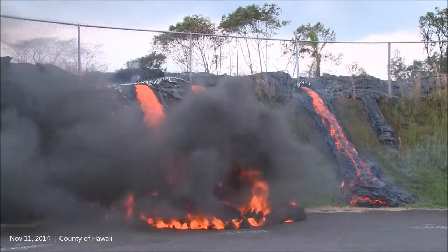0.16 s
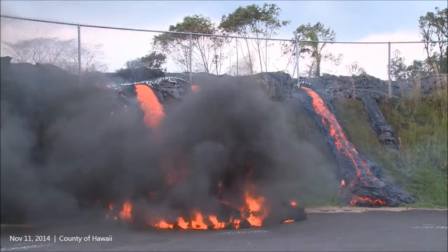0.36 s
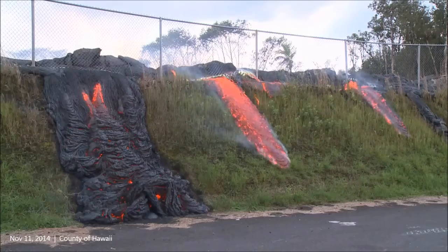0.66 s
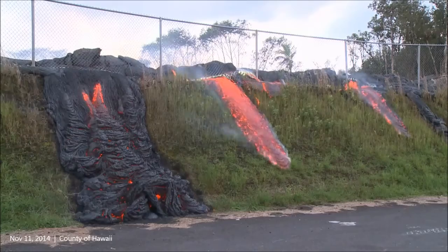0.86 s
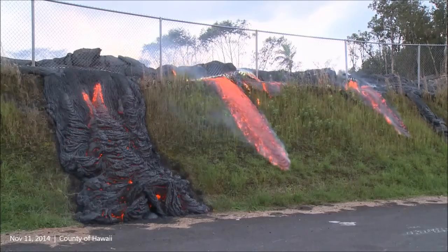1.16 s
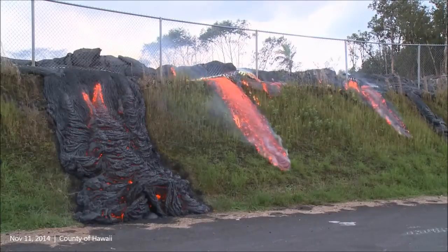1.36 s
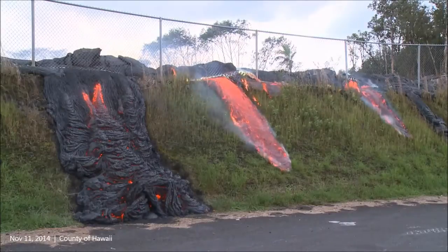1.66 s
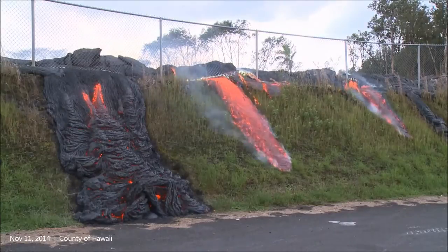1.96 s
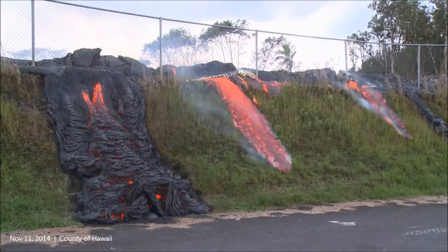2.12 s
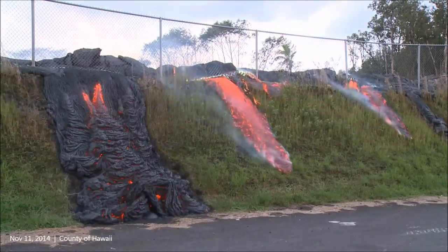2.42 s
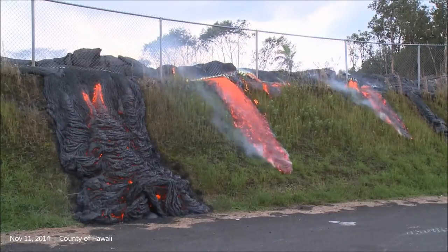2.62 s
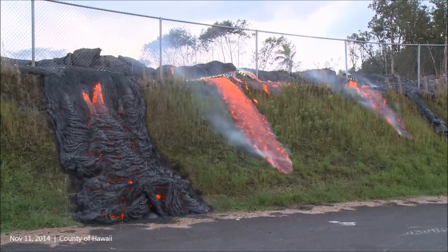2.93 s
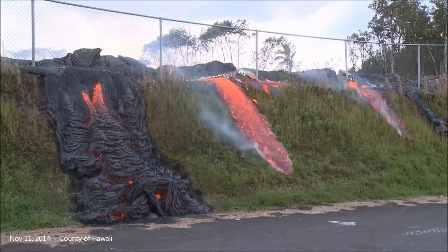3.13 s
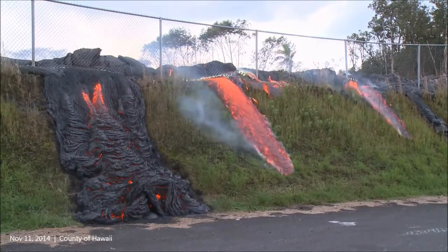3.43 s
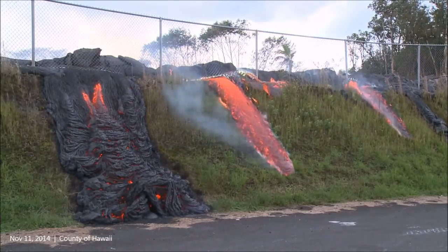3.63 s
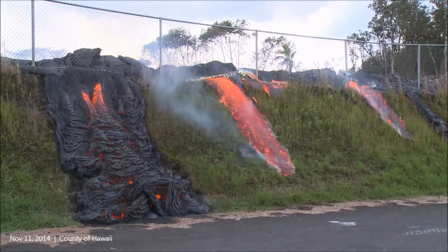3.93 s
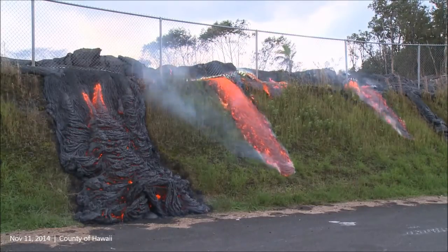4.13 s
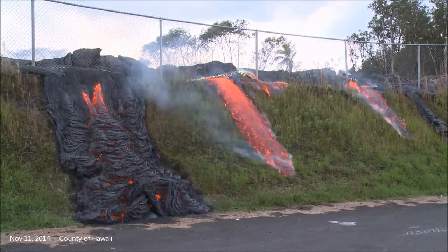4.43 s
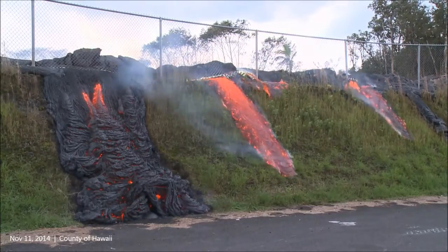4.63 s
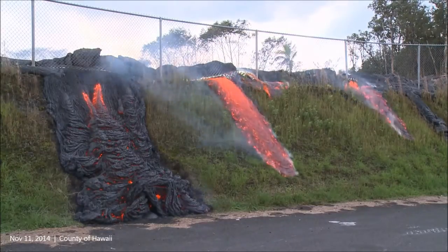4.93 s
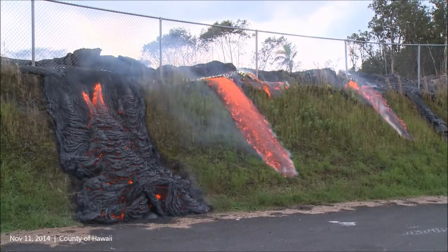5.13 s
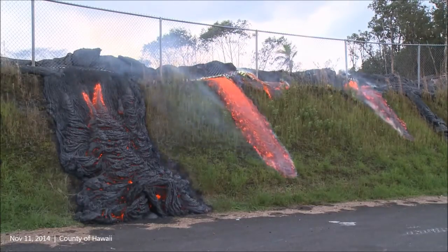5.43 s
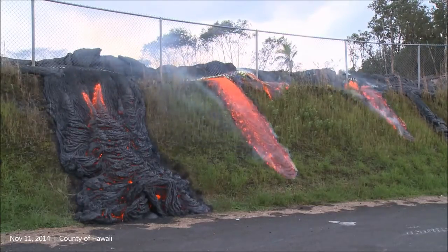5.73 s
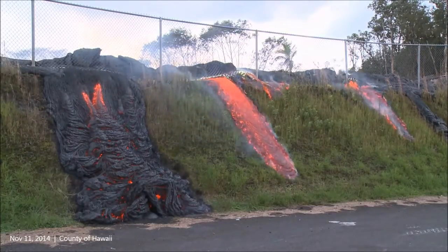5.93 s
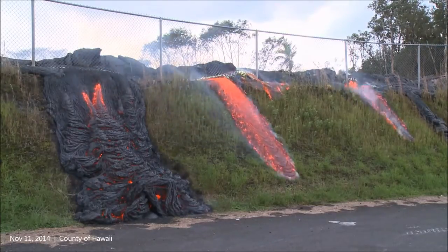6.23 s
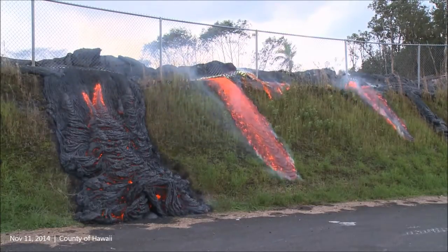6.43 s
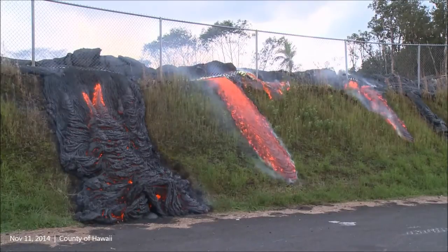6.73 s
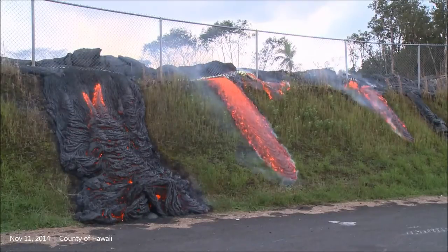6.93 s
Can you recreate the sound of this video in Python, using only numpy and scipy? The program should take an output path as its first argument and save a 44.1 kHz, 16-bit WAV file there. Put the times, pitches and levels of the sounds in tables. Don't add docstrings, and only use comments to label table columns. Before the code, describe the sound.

Brief close asphalt flames, a tiny silent gap, then irregular crackling and popping of burning grass with soft sizzle and low rumble.

```python
import sys
import numpy as np
from scipy import signal
from scipy.io import wavfile
from scipy.ndimage import uniform_filter1d

SR = 44100
rng = np.random.default_rng(int(sys.argv[2]) if len(sys.argv) > 2 else 0)


def volts_from_db(level):
    exponent = np.asarray(level, float) / 20
    return 10 ** exponent


def materialize(psi):
    bounded = np.clip(np.atleast_2d(psi).T, -1, 1)
    quanta = np.round(bounded * 32767).astype(np.int16)
    wavfile.write(sys.argv[1], SR, quanta)


N = 311787

CHANGE_S, MUTE_S, BACK_S = 0.504, 0.553, 0.6055
ECHO_MS = 1.6

# start_s, pop_peak_db, pulse_ms (pocket size), snap_peak_db, ground_echo_db
POCKET_BURSTS = [(0.1847, -35.5, 0.053, -58, -31), (0.2489, -34.5, 0.12, -68, -21),
                 (0.6077, -33.5, 0.047, -40, -17), (1.008, -29, 0.043, -35.5, -7),
                 (1.1351, -23, 0.028, -21.5, -21), (1.6107, -12.5, 0.012, -15, -33),
                 (1.7896, -26.5, 0.022, -56, -9), (1.8523, -33.5, 0.11, -43, -3),
                 (2.328, -29, 0.027, -27, -7), (2.7393, -35.5, 0.14, -54, -2),
                 (2.7472, -35.5, 0.048, -42, -12), (3.175, -23.5, 0.083, -36.5, -2),
                 (3.188, -27.5, 0.062, -40, -9), (3.201, -39.5, 0.032, -38, 8),
                 (3.5967, -15.5, 0.04, -18.5, -5), (3.8359, -24, 0.017, -46, -11),
                 (4.588, -31.5, 0.041, -37, 1), (4.6668, -25, 0.081, -42, -5.5),
                 (4.782, -31, 0.028, -33, -30), (5.4317, -26, 0.37, -67, -13),
                 (6.2424, -36, 0.22, -70, -15), (6.718, -32.5, 0.04, -37.5, -16),
                 (6.9203, -44, 0.021, -37, -8), (7.0151, -34.5, 0.047, -39, -21)]
# time_s, level_db
GRASS_BURN = [(0.61, -3), (0.8, 2.5), (1.2, 2.5), (1.5, -1.5), (1.75, 2.5), (1.95, 2.5), (2.15, -1.5),
              (2.3, 1.5), (2.5, -2.5), (2.9, -0.7), (3.2, -3), (3.55, -3), (4, 1.5), (4.3, 2.5),
              (4.6, 0.28), (5.1, 1.5), (5.4, -2.5), (7.07, -3.5)]


def bursts(way):
    # start_s, pop_peak_db, snap_peak_db
    thick_stems = [(0.3307, -38.5, -29.5), (0.6283, -39, -34.5), (0.8226, -40, -34), (1.047, -43, -32.5),
                   (1.0858, -37, -36), (1.1901, -44, -27.5), (1.2386, -37.5, -33), (1.2713, -32.5, -33),
                   (1.4127, -39, -35.5), (1.6283, -35, -35), (1.738, -38, -28), (1.7936, -40, -33),
                   (2.3077, -35.5, -33.5), (3.5507, -38, -35), (3.6006, -29, -43), (3.7814, -36.5, -35),
                   (3.8067, -36, -24), (3.832, -38, -27.5), (4.1345, -45, -31), (4.3888, -42, -24.5),
                   (4.497, -35, -28), (4.6504, -32, -37), (4.9473, -35, -36), (4.965, -38, -36),
                   (4.9788, -29.5, -25.5), (5.0023, -34, -33), (5.0301, -38, -33), (5.1691, -40.5, -34),
                   (5.6646, -33, -26), (5.7131, -29.5, -25.5)]
    # start_s, pop_peak_db, pulse_ms
    puffs = [(0.1305, -42, 0.014), (0.929, -36, 0.1), (0.9644, -38, 0.042), (1.5714, -40, 0.022),
             (1.66, -39, 0.16), (2.0303, -37.5, 0.052), (2.1832, -38.5, 0.092), (2.4603, -36.5, 0.13),
             (2.5054, -39.5, 0.025), (2.914, -38.5, 0.042), (2.931, -38, 0.018), (3.072, -38.5, 0.076),
             (3.628, -35.5, 0.027), (4.0487, -37.5, 0.038), (4.2034, -40, 0.038), (4.3374, -36, 0.047),
             (4.4332, -38.5, 0.048), (5.11, -38, 0.02), (5.121, -36, 0.033), (5.4997, -38.5, 0.03),
             (5.529, -36, 0.11), (5.4397, -38.5, 0.046), (5.8359, -37.5, 0.076), (6.099, -37, 0.028),
             (6.3287, -38.5, 0.02), (6.3572, -36.5, 0.032), (6.4433, -39.5, 0.017), (6.633, -39, 0.045),
             (6.6741, -41, 0.033), (6.8686, -37.5, 0.12),
             (0.022, -44, 0.034), (0.048, -41, .09), (0.061, -43, .1), (0.122, -43, .03), (0.157, -45, .06),
             (0.196, -43, .025), (0.2615, -42, .04), (0.368, -49, 0.032), (0.407, -48, .025),
             (0.4334, -44, .035), (0.4663, -44, 0.05), (1.4351, -41, 0.033), (1.641, -39, .03),
             (2.4832, -41, 0.033), (2.55, -41, 0.038), (2.8627, -40.5, 0.027), (2.937, -41, .12),
             (2.9887, -42, 0.043), (3.1058, -40, 0.036), (3.3686, -40, .03), (3.8168, -40, 0.035),
             (4.037, -40, 0.026), (5.8042, -38.5, 0.015), (5.995, -42, .085), (6.545, -45, .036),
             (6.7953, -41, .03), (6.911, -37.5, 0.016), (6.9674, -41, 0.08)]
    # start_s, snap_peak_db
    blades = [(0.6742, -36.5), (0.8704, -39), (0.926, -37), (1.101, -38.5), (1.259, -31.5), (1.3602, -33.5),
              (1.5583, -39.5), (1.872, -39.5), (1.934, -37.5), (1.9798, -34), (2.1044, -36.5),
              (2.1544, -34), (2.233, -39.5), (2.2821, -35.5), (2.712, -40), (3.2645, -38.5),
              (3.7214, -35.5), (3.881, -39), (4.127, -32.5), (4.257, -39), (4.4205, -33.5), (4.7424, -36.5),
              (4.8941, -34.5), (4.9169, -32), (4.9577, -29), (5.06, -33.5), (5.087, -33.5), (5.2238, -34),
              (5.9005, -35.5), (6.1145, -40),
              (0.087, -41), (0.0997, -41), (0.1648, -44), (0.4562, -48), (0.6185, -40), (0.7348, -40),
            (0.915, -39), (0.9715, -39), (1.4047, -43), (1.4597, -42), (1.6229, -36), (1.7115, -40),
            (1.8843, -41), (1.9608, -38.5), (2.1722, -39), (2.7664, -46), (2.809, -42), (3.114, -40),
            (3.3005, -39), (3.5043, -41), (3.8614, -46), (4.29, -40), (4.4734, -38), (4.803, -37),
            (4.9102, -35), (4.9385, -37), (5.114, -37), (5.3092, -44), (6.2666, -44.5), (7.0639, -46)]
    puff_snap_db, puff_echo_db = -9, -16.5
    blade_pop_db, stem_echo_db, stem_ms = -11, -8, 0.027
    echo_spread = 0.2

    pockets = POCKET_BURSTS + [(s, db, ms, db + puff_snap_db, puff_echo_db) for s, db, ms in puffs]
    stems = thick_stems + [(s, db + blade_pop_db, db) for s, db in blades + strays()]
    rows = pockets + [(s, pop_db, stem_ms, snap_db, stem_echo_db) for s, pop_db, snap_db in stems]

    out = np.zeros(N + 3000)
    t = np.arange(500) / SR
    chance = rng.standard_normal((len(rows), 2, len(t)))
    for k, (start_s, pop_db, pulse_ms, snap_db, echo_db) in enumerate(rows):
        c, d = chance[k]
        varies = k >= len(POCKET_BURSTS)
        echo_ms = ECHO_MS * (1 + echo_spread * np.tanh(c[0]) * varies)
        scatter = c * (abs(d) > 1.2) * volts_from_db(-20 - 60 * t / 0.013)
        scatter[0] = 1
        scatter[round(echo_ms / 1000 * SR)] = volts_from_db(min(echo_db, 0))
        scatter[round(7.9 / 1000 * SR)] = volts_from_db(echo_db - 17)
        pop = above(pocket(pulse_ms), hz=min(0.45 / pulse_ms ** 2, 850))
        tear = d[:90] * volts_from_db(-15 - 60 * t[:90] / 0.004)
        tear[0] = -1
        blunt = 0.45 if k < len(pockets) else 0.08
        snap = above(signal.lfilter([1], np.poly(2 * [blunt]), tear), hz=3620)
        for sound, peak_db in ((pop, pop_db), (snap, snap_db)):
            heard = np.convolve(np.convolve(sound, way), scatter)
            out[round(start_s * SR):][:len(heard)] += volts_from_db(peak_db) * heard / abs(heard).max()
    return out[:N]


def pocket(pulse_ms):
    u = np.arange(700) / SR / (np.clip(pulse_ms, 0.005, 3) / 1000)
    rebound = 1.7 + 7 * pulse_ms
    push = u ** 2 * np.exp(-u)
    back = (u / rebound) ** 2 * np.exp(-u / rebound) / rebound
    return back - push


def strays():
    count, level_db, spread_db = 200, -49.5, 3
    t = np.arange(N) / SR
    share = np.cumsum(curve(GRASS_BURN, order=1) * (t > BACK_S))
    when, size = rng.random((count, 2)).T
    start_s = np.interp(when, share / share[-1], t)
    return list(zip(start_s, level_db - spread_db * np.log(size + 0.025)))


def embers():
    level_db, delay_s, t60_s = -28, 0.029, 0.43
    low_hz, top_hz = 2800, 11500
    t = np.arange(SR // 2) / SR
    swell = np.minimum(t / delay_s, 1) ** 2 * volts_from_db(-60 * np.maximum(t - delay_s, 0) / t60_s)
    pops = np.zeros(N)
    for start_s, pop_db, *_ in POCKET_BURSTS:
        pops[round(start_s * SR)] = volts_from_db(2 * pop_db + level_db)

    def colour(hz):
        return 0.5 * path_db(hz) - np.maximum(low_hz - hz, 0) / 90 - np.maximum(hz - top_hz, 0) / 90

    spray = noise(colour, patchy_db=5.0, flicker_db=-1.0, size=256)
    return signal.oaconvolve(pops, swell)[:N] * spray


def grass(way):
    hiss_db, fizz_db, hiss_follows = -60, -72.5, 0.25

    def hiss_colour(hz):
        return path_db(hz) - 30 * (hz < 180) - np.maximum(hz - 3300, 0) / 90

    def sizzle_colour(hz):
        return path_db(hz) - np.maximum(4400 - hz, 0) / 90

    hiss = noise(hiss_colour, patchy_db=0.0, flicker_db=3.5)
    thuds = crackle(way, per_s=230, spread_db=0.5, pulse_ms=0.099)
    ticks = crackle(way, per_s=260, spread_db=4.5, pulse_ms=0.01)
    sizzle = noise(sizzle_colour, patchy_db=0.5, flicker_db=2.5, size=256)
    fizz = evened(above(crackle(way, per_s=310, spread_db=2.5, pulse_ms=0.0028), hz=4500))
    burn = curve(GRASS_BURN, order=1)
    low = volts_from_db(hiss_db) * burn ** hiss_follows * (hiss + volts_from_db(-7.5) * thuds + volts_from_db(-7.0) * ticks)
    high = volts_from_db(fizz_db) * burn * (sizzle + volts_from_db(-3.5) * fizz)
    return low + high + embers()


def crackle(way, per_s, spread_db, pulse_ms):
    size = volts_from_db(spread_db * np.minimum(rng.exponential(1, N), 3.5))
    hits = size * (rng.random(N) < per_s / SR)
    both = hits + 0.5 * np.roll(hits, round(ECHO_MS / 1000 * SR))
    return evened(signal.oaconvolve(both, np.convolve(pocket(pulse_ms), way))[:N])


def blaze(way):
    # time_s, level_db
    blaze_level = [(0.0, -55.5), (0.306, -59), (0.5, -58.5)]
    # freq_hz, level_db (per Hz)
    blaze_spectrum = [(150, -25), (300, -2), (700, -4), (1600, 0), (2600, -2), (4200, -11), (6500, -14),
                      (9500, -19), (15800, -25), (16500, -40)]
    flames = noise(lambda hz: read(blaze_spectrum, hz), patchy_db=0.5, flicker_db=3.5, size=256)
    spit = crackle(way, per_s=440, spread_db=11.0, pulse_ms=0.011)
    return curve(blaze_level, order=1) * (flames + volts_from_db(-13) * spit)


def whistle():
    # start_s, length_s, pitch_hz, level_db
    stem_whistle = (1.74, .024, 4650, -63)
    start_s, length_s, pitch_hz, level_db = stem_whistle
    t = np.arange(N) / SR - start_s
    swell = np.sin(np.pi * np.clip(t / length_s, 0, 1)) ** 0.5
    waver = np.sin(2 * np.pi * 70 * t)
    return volts_from_db(level_db) * swell * np.sin(2 * np.pi * pitch_hz * t + waver)


def bank(x):
    t = np.arange(SR // 4) / SR
    rise = np.clip((t - 0.014) / 0.016, 0, 1)
    tail = above(rng.standard_normal(len(t)), hz=1480) * rise * volts_from_db(-60 * t / 0.053)
    return volts_from_db(-26.0) * signal.oaconvolve(x, tail / np.linalg.norm(tail))[:N]


def rumble():
    # centre_s, peak_db, half_length_s
    gusts = [(0.7, -47.5, 0.085), (0.895, -48, 0.12), (1.245, -49.5, 0.051), (1.372, -37.5, 0.033),
             (1.43, -49, .05), (1.996, -58.5, 0.24), (2.68, -56, .12), (3.2, -63, 0.14), (3.85, -59, 0.17),
             (4.594, -60, 0.17), (5.6, -55.5, 0.2), (6.122, -51.5, 0.1), (6.57, -57, 0.055)]
    # freq_hz, level_db
    gust_spectrum = [(12, -1), (30, 12.5), (55, 8.5), (80, 1.5), (140, -43)]
    # freq_hz, level_db
    roar_spectrum = [(45, -25.5), (75, -1.5), (130, -3), (200, -10.5), (320, -18), (600, -47)]
    wind_db, fire_db, asphalt_fire_db, roar_follows = -59.5, -57.5, -61, 0.09
    gust = noise(lambda hz: read(gust_spectrum, hz), patchy_db=0.5, flicker_db=-1.0, size=4096)
    roar = noise(lambda hz: read(roar_spectrum, hz), patchy_db=0.0, flicker_db=1.1, size=2048)
    t = np.arange(N) / SR
    power = volts_from_db(wind_db) ** 2
    for centre_s, peak_db, half_s in gusts:
        power = power + (volts_from_db(peak_db) * np.exp(-((t - centre_s) / half_s) ** 2)) ** 2
    wind = np.sqrt(power)
    fanned = (wind / volts_from_db(wind_db)) ** roar_follows
    fire = volts_from_db(np.where(t < MUTE_S, asphalt_fire_db, fire_db)) * fanned
    return wind * gust + fire * roar


def path_db(hz):
    # freq_hz, level_db
    broad = [(200, -1), (700, 0), (1300, -4), (2300, 0), (3500, -9), (4650, -14.5), (6500, -13.5),
             (10500, -12.5), (12700, -15.5), (14200, -25), (15200, -14.5), (15800, -15.5), (16300, -27),
             (17000, -40)]
    # freq_hz, width_hz, depth_db
    housing_notches = [(3150, 250, -3), (4300, 250, -7), (4980, 250, -11), (5900, 350, -4), (7200, 500, -4),
                       (9250, 350, -4), (12000, 500, -3)]
    dips = sum(db * np.exp(-((hz - f) / width) ** 2) for f, width, db in housing_notches)
    return read(broad, hz) + dips


def path(size=2048):
    log_gain = np.log(volts_from_db(path_db(abs(np.fft.fftfreq(size, 1 / SR)))))
    spectrum = np.exp(np.conj(signal.hilbert(log_gain)))
    return np.fft.ifft(spectrum).real[:size // 4]


def noise(colour, patchy_db, flicker_db, size=512):
    frames = 4 * N // size + 5
    hz = np.fft.rfftfreq(size, 1 / SR)
    a, b, patches = rng.standard_normal((frames, len(hz), 3)).T
    patches = uniform_filter1d(patches, size=7, axis=0)
    patches = evened(uniform_filter1d(patches, size=14, axis=1))
    flicker = evened(uniform_filter1d(rng.standard_normal(frames), size=3))
    level_db = colour(hz)[:, None] + patchy_db * patches + flicker_db * flicker
    z = (a + 1j * b) * volts_from_db(level_db)
    return evened(signal.istft(z, nperseg=size, noverlap=3 * size // 4)[1][:N])


def evened(x):
    return x / np.sqrt(np.mean(x ** 2) + 1e-20)


def read(points, hz):
    f, value = np.transpose(points)
    return np.interp(np.log(hz + 1), np.log(f + 1), value)


def curve(rows, order):
    return volts_from_db(np.interp(np.arange(N) / SR, [r[0] for r in rows], [r[order] for r in rows]))


def below(x, hz):
    return signal.oaconvolve(x, signal.firwin(401, hz, window=("kaiser", 8), fs=SR), "same")


def above(x, hz):
    return signal.sosfilt(signal.butter(2, hz, "high", fs=SR, output="sos"), x)


def scene():
    way = path()
    fire = np.where(np.arange(N) / SR < MUTE_S, blaze(way), grass(way))
    near = bursts(way)
    return (fire + near + bank(near) + whistle() + rumble())[None]


def low_pass(x):
    return signal.sosfilt(signal.butter(12, 17130, fs=SR, output="sos"), x)


def record(dry):
    body_edge_hz, top_edge_hz = 15900, 16600
    t = np.arange(N) / SR
    leftover_db = np.interp(t, [CHANGE_S, MUTE_S - 0.012, MUTE_S], [-86, -90, -104])
    leftover = volts_from_db(leftover_db) * rng.standard_normal(N)
    gap = (t > CHANGE_S) & (t < BACK_S)
    joined = np.where(gap, leftover * (t < MUTE_S), dry[0])
    body = below(joined, body_edge_hz)
    top = below(joined, top_edge_hz) - body
    crack = uniform_filter1d(1. * (abs(top) > volts_from_db(-70)), size=900) > 0
    gate = uniform_filter1d(1. * crack, size=200)
    mix = (body + volts_from_db(-7) * top * gate)[None]
    return low_pass(mix)


dry = scene()
out = record(dry)
materialize(out)
```